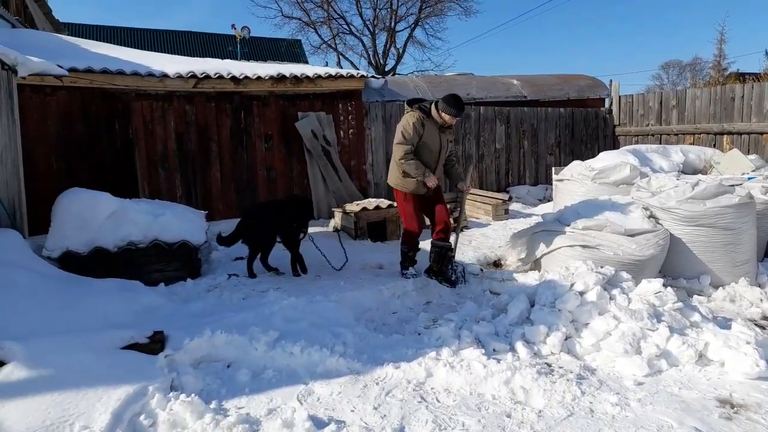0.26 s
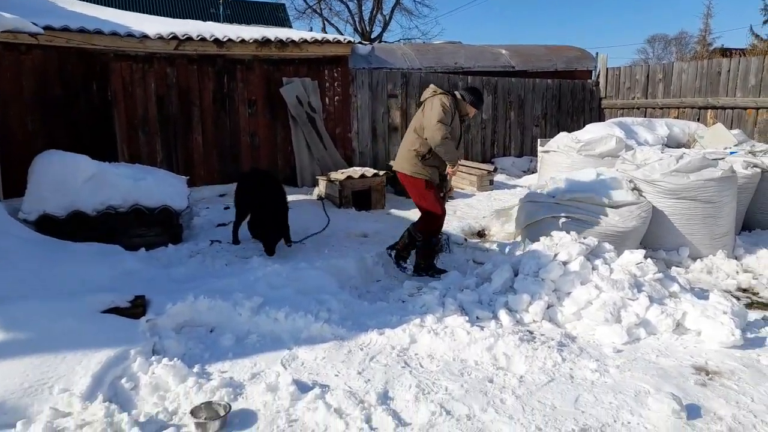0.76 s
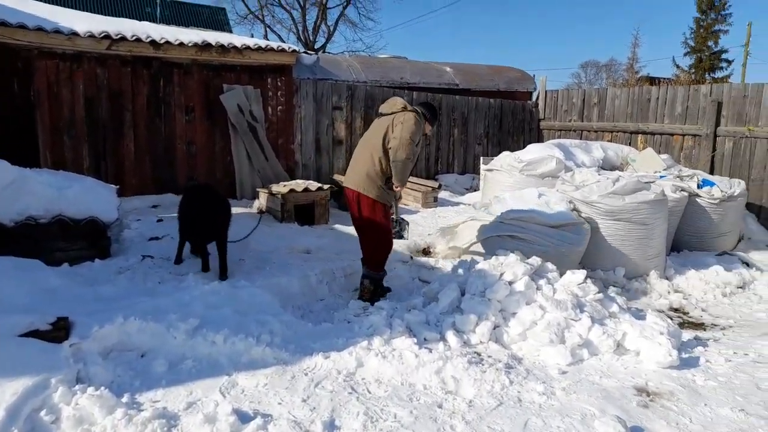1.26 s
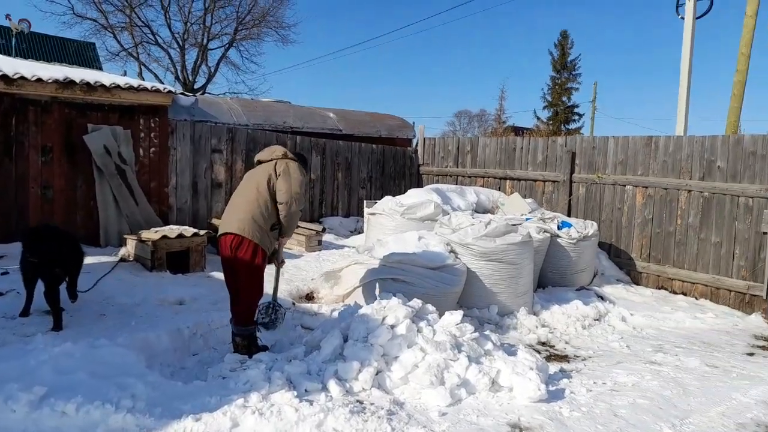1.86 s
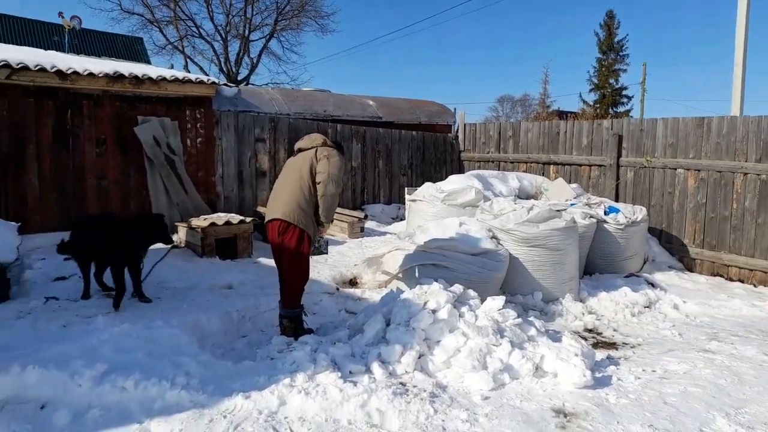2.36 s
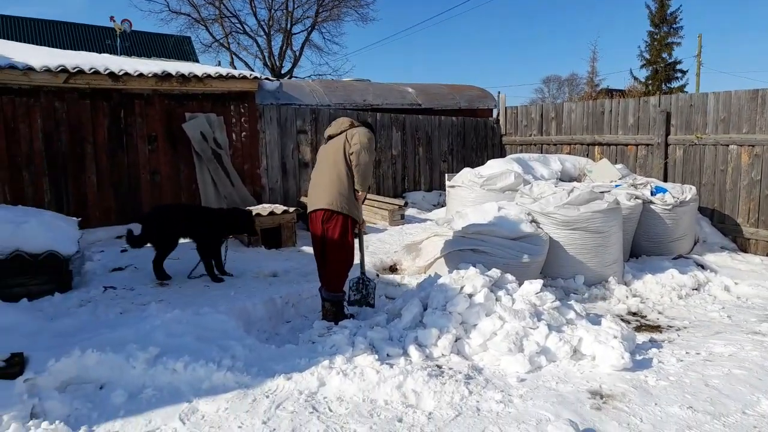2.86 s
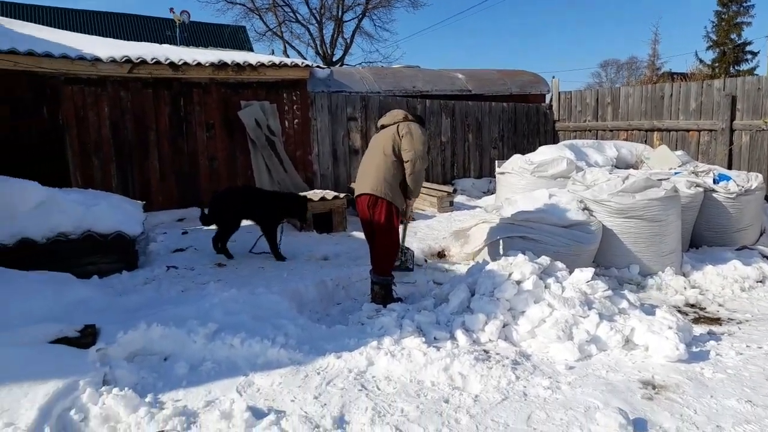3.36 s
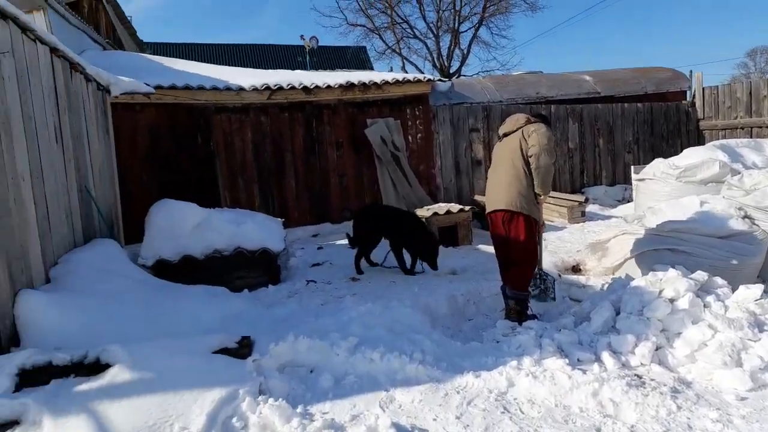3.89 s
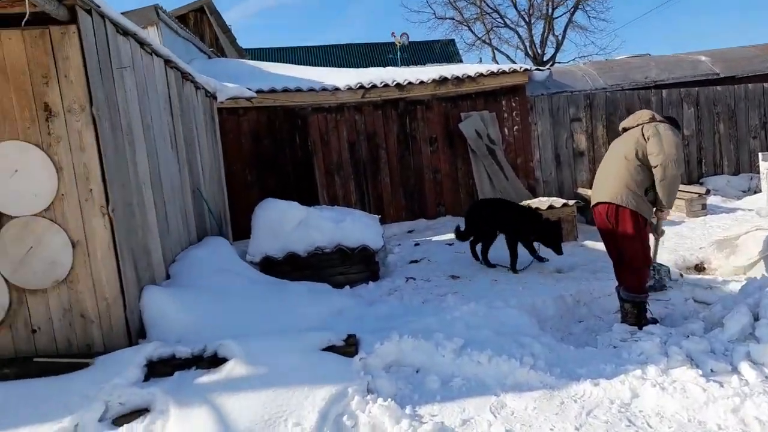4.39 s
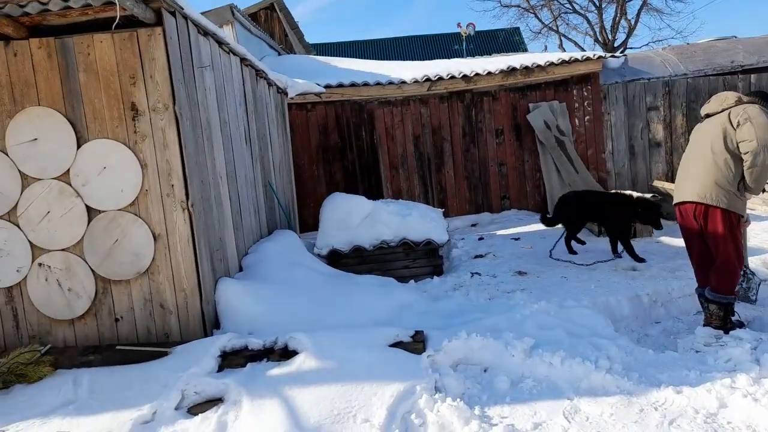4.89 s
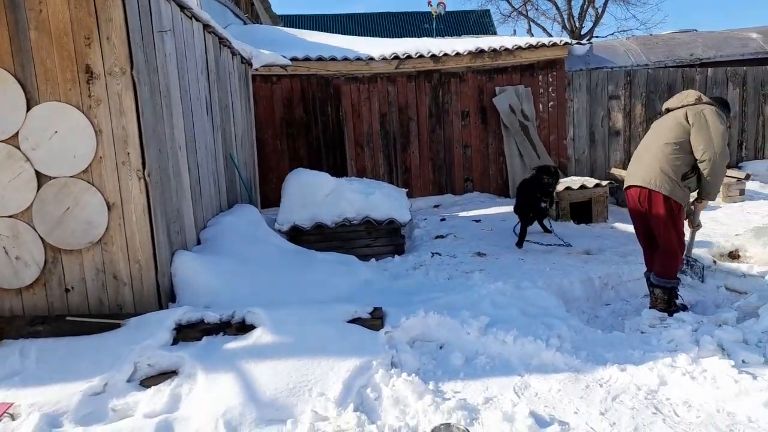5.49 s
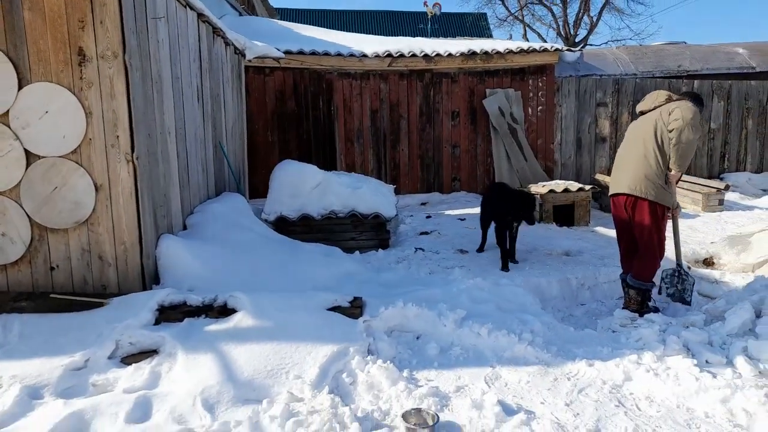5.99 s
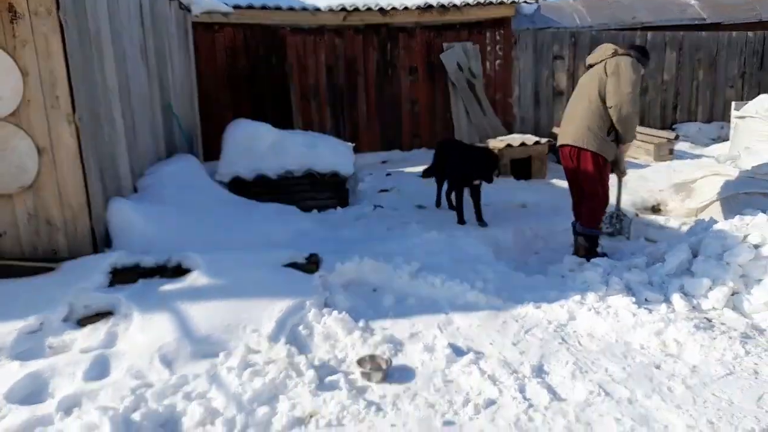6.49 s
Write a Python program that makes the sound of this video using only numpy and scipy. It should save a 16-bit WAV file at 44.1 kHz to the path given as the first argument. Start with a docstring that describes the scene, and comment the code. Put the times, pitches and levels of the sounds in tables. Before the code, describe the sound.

Low, fluttering gusts hit an unprotected microphone while someone in rustling winter clothing shovels crusty snow. After a quiet start come sharp, dry chops with a brief low thud, crackling crystals, a short scrape and loose crumbs falling. Bright high chain links jingle lightly between the strokes, and small metal clinks occur twice. Open yard, very little echo, shovel at a moderate distance.

```python
"""A shovel chops and scrapes packed snow in a fenced yard.
Crystals crack under the blade as random clicks, and its resonances colour them; loose snow patters down.
A chain jingles and metal clinks twice, both as fading sines. Clothing and boots rustle as shaped noise.
Gusts buffet the microphone as lumpy low noise; a changing lag between the ears moves the shovel."""
import sys
import numpy as np
from scipy import signal
from scipy.fft import rfft, irfft, next_fast_len
from scipy.io import wavfile
from scipy.ndimage import uniform_filter1d

SR = 44100
rng = np.random.default_rng(int(sys.argv[2]) if len(sys.argv) > 2 else 0)


def inscribe(sig):
    """Save sig as 16-bit PCM at rate SR to the path in sys.argv[1].

    A 1-D sig is mono; a 2-D sig holds one channel per row.
    Samples are clipped to [-1, 1] before scaling.
    """
    pcm = np.round(np.clip(np.atleast_2d(sig).T, -1, 1) * 32767)
    wavfile.write(sys.argv[1], SR, pcm.astype(np.int16))


N = 297410  # length of the scene in samples


def from_db(db):
    """Turns decibels into a gain."""
    return 10 ** (np.asarray(db) / 20)


def rms_one(x):
    """Scales a sound to unit power."""
    return x / np.sqrt(np.mean(x ** 2) + 1e-20)


def in_time(rows):
    """Draws straight lines between the rows and reads each column at every sample."""
    seconds, *columns = np.transpose(rows)
    return [np.interp(np.arange(N) / SR, seconds, column) for column in columns]


def drift(rate_hz):
    """Random wandering that is slower than about rate_hz; rms 1."""
    size = next_fast_len(N, real=True)
    hz = np.arange(size // 2 + 1) * SR / size
    slowed = rfft(rng.standard_normal(size)) / (1 + (hz / rate_hz) ** 4)
    return rms_one(irfft(slowed, size)[:N])


def noise(spectrum, alike):
    """Stereo noise of a given colour; alike is the share of power common to both channels; rms 1."""
    table_hz, table_db = np.transpose(spectrum)
    size = next_fast_len(N, real=True)
    hz = np.arange(size // 2 + 1) * SR / size
    gain = from_db(np.interp(np.log(hz + 1e-9), np.log(table_hz), table_db, left=-np.inf))
    alike = np.clip(alike, 0, 1)
    shared = np.sqrt(alike) * rng.standard_normal(size)
    white = shared + np.sqrt(1 - alike) * rng.standard_normal((2, size))
    return rms_one(irfft(rfft(white) * gain, size)[:, :N])


def band(x, low_hz, high_hz, order=2):
    """Keeps only the pitches between two limits."""
    edges = [low_hz, min(high_hz, .47 * SR)]
    return signal.sosfilt(signal.butter(order, edges, "band", fs=SR, output="sos"), x + 1e-18)


def narrow(hz, width_hz):
    """A band of stereo hiss around one pitch; rms 1."""
    return rms_one(band(rng.standard_normal((2, N)), hz - width_hz / 2, hz + width_hz / 2))


def register(x, low_hz, high_hz):
    """One band of the crackle; white input keeps its power."""
    return band(x, low_hz, high_hz, order=3) * np.sqrt(SR / 2 / (high_hz - low_hz))


def ring(clicks, hz, t60):
    """Each unit click starts a sine of height 1 that falls by 60 dB in t60 seconds."""
    keep = from_db(-60 / (t60 * SR))  # what is left after one sample
    w = 2 * np.pi * hz / SR
    return signal.lfilter([0, np.sin(w)], [1, -2 * keep * np.cos(w), keep * keep], clicks + 1e-18)


def envelope(start, length, attack, release):
    """Exponential swell up to the start, hold at 1, exponential decay; all in seconds."""
    t = np.arange(N) / SR
    before = np.maximum(start - t, 0) / attack
    after = np.maximum(t - start - length, 0) / release
    return np.exp(-np.minimum(before + after, 30))


def evened(x, window_s):
    """Holds the level of a noise steady over a short, rounded window."""
    size = int(window_s * SR)
    power = uniform_filter1d(uniform_filter1d(np.mean(x ** 2, axis=0), size), size // 2)
    return x / np.sqrt(power + 1e-6)


def crumbs(per_s, cycles, low_hz=1400, high_hz=8500, count=20):
    """Lumps of crust snap off at random, each with a short ring at one of several pitches; rms 1."""
    sizes = from_db(4.0 * np.minimum(rng.exponential(1, N), 3))
    snaps = sizes * rng.choice([-1, 1], N) * (rng.random(N) < per_s / SR)
    dealt = rng.integers(0, count, N)  # which pitch each lump gets
    total = np.zeros((2, N))
    for k, hz in enumerate(np.geomspace(low_hz, high_hz, count)):
        ringing = ring(snaps * (dealt == k), hz, cycles / hz)
        total += ringing * np.sqrt(hz) * rng.uniform(0.28, 1, (2, 1))
    return rms_one(total)


# Steady breeze on the microphone. Each row: time in seconds, strength in dB.
BREEZE = [(0, -38.5), (.3, -33.5), (.6, -42.5), (.95, -35), (1.22, -57), (1.5, -49.5), (1.7, -42),
          (2.05, -26), (2.3, -42), (2.49, -29), (2.58, -49), (2.8, -58), (3.4, -73), (3.88, -40.5),
          (4.12, -55), (4.85, -30.5), (5.35, -39.5), (5.72, -27.5), (6.27, -73), (6.72, -45)]
# Gusts on top of it. Each row: peak time in seconds, strength in dB,
# time to rise or sink by a factor e in seconds.
GUSTS = [(0.215, -22, 0.026), (0.432, -29.5, 0.039), (0.757, -27.5, 0.047), (1.624, -34, 0.014),
         (2.195, -23, 0.024), (1.98, -32, 0.0097), (3.129, -38.5, 0.026), (4.804, -22, 0.023),
         (5.174, -25.5, 0.038), (5.497, -21, 0.011), (5.98, -30.5, 0.14), (6.541, -34, 0.096)]
# Sudden puffs of wind. Each row: peak time in seconds, level in dB, half length in seconds.
PUFFS = [(0.142, -25, 0.0071), (0.196, -16, 0.016), (.25, -10, 0.013), (0.757, -32, 0.033),
         (1.972, -28, 0.0062), (2.058, -24, 0.0017), (2.178, -39, 0.006), (4.846, -29, 0.0022),
         (4.949, -35.5, 0.0074), (5.185, -45, 0.016), (5.747, -33.5, 0.062)]
# Colours of the low rumble, the flutter and the puffs. Each row: pitch in Hz, relative level in dB per Hz.
RUMBLE_COLOUR = [(15, -32), (30, -15), (50, 2.5), (110, 5), (160, 4), (230, -4.5), (400, -51)]
FLUTTER_COLOUR = [(90, 3), (150, 0.5), (290, 1.5), (480, -6), (680, -20), (950, -31.5), (1500, -36.5),
                  (4000, -101)]
PUFF_COLOUR = [(30, -59), (110, -5), (280, 7.5), (500, 1.5), (720, -7), (1000, -22.5), (1600, -38.5),
               (5000, -53)]
WIND_TOP_HZ = 3000  # the wind holds no treble above this pitch


def wind():
    """Eddies hit the microphone in lumps; the stronger the gust, the higher in pitch it reaches."""
    t = np.arange(N) / SR
    breeze_db = -40  # strength at which the three layers have their base levels
    power = from_db(in_time(BREEZE)[0]) ** 2
    for s, db, length in GUSTS:
        power = power + (from_db(db) * envelope(s, 0, length, length)) ** 2
    gust_db = 10 * np.log10(power) - breeze_db
    lumps = rms_one(from_db(5.57 * np.array([drift(45.0), drift(64)])))  # one row per channel
    rumble = from_db(breeze_db - 1.0 + 0.77 * gust_db) * evened(noise(RUMBLE_COLOUR, alike=0.078), 0.078)
    flutter = from_db(breeze_db - 3.5 + 1.0 * gust_db) * evened(noise(FLUTTER_COLOUR, alike=0.04), 0.05)
    buffet = from_db(breeze_db - 21.5 + 1.59 * gust_db)
    puffs = sum(from_db(db) * np.exp(-.5 * ((t - s) / length) ** 2) for s, db, length in PUFFS)
    gusty = np.hypot(buffet, puffs) * evened(noise(PUFF_COLOUR, alike=0.32), 0.0094)
    eddies = lumps * (rumble + flutter) + gusty
    return signal.sosfilt(signal.butter(2, WIND_TOP_HZ, fs=SR, output="sos"), eddies)


# Colour of the still air. Each row: pitch in Hz, relative level in dB per Hz.
AIR_COLOUR = [(250, 13.5), (550, 12), (1200, -3.5), (2500, -4), (4300, -15.5), (6700, -4.5), (9000, -8.5),
              (15500, -10)]


def still_air():
    """A faint, steady, coloured hiss."""
    return from_db(-57.5) * noise(AIR_COLOUR, alike=0.058)


# Movements that stir clothing and loose snow. Each row: start in seconds, length in seconds, level in dB.
MOVES = [(0.07, 0.19, -59.5), (0.368, 0.48, -56), (0.967, 0.13, -54.5), (1.475, 0.21, -51.5),
         (1.845, .19, -48), (2.482, 0.37, -53.5), (3.437, 0.62, -53.5), (4.322, 0.6, -52.5),
         (5.064, 0.062, -53), (5.545, 0.39, -50), (6.335, 0.44, -56.5)]
# Boots scuffing the snow. Each row: time in seconds, level in dB.
STEPS = [(.578, -51), (.663, -49.5), (.96, -49), (1.125, -52), (5.388, -51.5), (6.095, -62.5)]
# Colour of rustling cloth. Each row: pitch in Hz, relative level in dB per Hz.
CLOTH_COLOUR = [(500, 14.5), (1200, 0.5), (2500, 0.5), (4200, -2.5), (6500, -2), (9500, -4), (14000, -2.5),
                (17000, -20)]
MOVE_ATTACK_S, MOVE_RELEASE_S = 0.085, 0.1
STEP_ATTACK_S, STEP_RELEASE_S = 0.014, 0.012


def rustle():
    """Every movement and step stirs cloth and loose snow, with fine crumbs trickling through it."""
    power = np.zeros(N)
    for s, length, db in MOVES:
        power += (from_db(db) * envelope(s, length, MOVE_ATTACK_S, MOVE_RELEASE_S)) ** 2
    for s, db in STEPS:
        power += (from_db(db) * envelope(s, 0, STEP_ATTACK_S, STEP_RELEASE_S)) ** 2
    cloth = noise(CLOTH_COLOUR, alike=0.018) + from_db(-15.0) * crumbs(per_s=200, cycles=12)
    return np.sqrt(power) * from_db(1.0 * drift(110)) * cloth


# Sharp metal clinks. Each row: time in seconds, relative level in dB.
CLINKS = [(0.3208, -18), (3.994, -18)]
# Ringing tones of the metal. Each row: pitch in Hz, relative level in dB, time to fall by 60 dB in seconds.
METAL = [(2850, -2, 0.017), (3080, 12, 0.019), (4800, 3.5, 0.012), (5580, -4, 0.047), (6340, -8, 0.21),
         (10960, 1.5, 0.015)]


def clinks():
    """A hard contact: a brief crack of noise and a thin ring."""
    t = np.arange(N) / SR
    clicks, crack = np.zeros((2, N)), np.zeros(N)
    for s, db in CLINKS:
        clicks[:, int(s * SR)] = from_db(db)
        crack += from_db(db) * (t >= s) * np.exp(-np.abs(t - s) / 0.0037)
    rings = sum(from_db(db - 18.0) * ring(clicks, hz, t60) for hz, db, t60 in METAL)
    hiss = rms_one(band(rng.standard_normal((2, N)), 1100, 5400, order=1))
    return rings + from_db(-10.0) * hiss * crack


# A sleeve zips thinly over the jacket as the shovel is lifted.
# Each row: start in seconds, length in seconds, relative level in dB, pitch in Hz.
ZIPS = [(1.476, 0.021, -45.5, 8500), (1.513, 0.014, -51, 8900), (1.542, 0.019, -47.5, 8930),
        (1.572, 0.011, -51.5, 9500), (1.599, 0.013, -49.5, 9150), (1.615, 0.0049, -46, 10100)]
ZIP_UPPER_RATIO, ZIP_WIDTH_HZ, ZIP_ROUGH_DB = 1.18, 500, 3  # second band's pitch ratio, width, roughness


def sleeve():
    """Ribbed fabric catches on itself: each stroke is a rough scratch with two hoarse bands."""
    scratch = from_db(-5.0) * narrow(10800, 7000)
    strokes = np.zeros((2, N))
    for s, length, db, hz in ZIPS:
        lower = narrow(hz, ZIP_WIDTH_HZ)
        upper = narrow(hz * ZIP_UPPER_RATIO, 2 * ZIP_WIDTH_HZ)
        strokes += from_db(db) * envelope(s, length, 0.01, 0.0084) * rms_one(lower + upper + scratch)
    return strokes * rms_one(from_db(ZIP_ROUGH_DB * drift(200)))


RASP_START_S, RASP_LENGTH_S, RASP_DB = 1.56, 0.41, -56  # around the first stroke


def rasp():
    """A dry, faint, narrow rubbing sound, perhaps the handle sliding through a glove."""
    hiss = rms_one(band(rng.standard_normal((2, N)), 2120, 2700))
    return from_db(RASP_DB + 2.0 * drift(25)) * envelope(RASP_START_S, RASP_LENGTH_S, 0.04, .04) * hiss


# Soft low thumps on the microphone. Each row: peak time in seconds, level in dB, pitch in Hz.
THUMPS = [(1.622, -24.5, 144.5), (3.105, -49, 120), (4.793, -24, 102.5)]


def thumps():
    """Low bumps of a few cycles each, swelling and fading around their peak."""
    t = np.arange(N) / SR
    total = np.zeros((2, N))
    for s, db, hz in THUMPS:
        wave = np.sin(2 * np.pi * hz * t + rng.standard_normal((2, 1)))  # random phase per channel
        total += from_db(db) * envelope(s, 0, 1 / hz, 1 / hz) * wave
    return total


# Direction of the shovel. Each row: time in seconds, lag of the left channel in ms.
BEARING = [(1.8, -0.057), (2.53, -0.038), (3.44, 0.005), (3.76, 0.086), (4.46, 0.24), (5.9, 0.25),
           (6.5, 0.14), (6.7, 0.12)]


def fractures(per_s, spread_db, direct):
    """Crystals crack at random; a direct share arrives with the shovel's lag, the rest is scattered."""
    sizes = from_db(spread_db * np.minimum(rng.exponential(1, (3, N)), 5))
    cracks = sizes * rng.choice([-1, 1], (3, N)) * (rng.random((3, N)) < per_s / SR)
    lag_ms, = in_time(BEARING)
    late = np.clip(np.arange(N) - np.round(lag_ms * SR / 1000).astype(int), 0, N - 1)
    direct = np.clip(direct, 0, 1)
    from_shovel = np.array([cracks[0, late], cracks[0]])
    return rms_one(np.sqrt(direct) * from_shovel + np.sqrt(1 - direct) * cracks[1:])


# The blade biting the crust. Each row: peak time in seconds, crunch in dB, thud relative to the crunch
# in dB, grind relative to the crunch in dB, time to fall by a factor e in seconds.
BITES = [(1.787, -13.5, -9, 2.5, 0.0038), (1.802, -32.5, 0.5, 9, 0.0034), (1.811, -29, -1, 10.5, 0.0016),
         (2.527, -12.5, -5.5, 0.5, 0.0028), (2.654, -34.5, -7, 6.5, 0.012), (2.706, -36.5, -29, 5.5, 0.006),
         (3.439, -24, -11, -0.5, 0.02), (3.639, -35.5, -14, 3, 0.0035), (3.747, -23.5, -33, -5.5, 0.033),
         (3.766, -23, -21, -7, 0.0079), (4.426, -35, -12, -9, 0.016), (4.465, -14, -12, -7, 0.006),
         (4.787, -30.5, -22, 9, 0.0046), (5.456, -25, -21, -0.5, 0.0015),
         (5.492, -15.5, -19.5, -7.5, 0.007), (5.702, -26.5, -4, -2, 0.0015),
         (5.711, -33.5, -17, -11, 0.0037), (5.778, -32.5, -24, -4, 0.0037), (6.506, -32.5, -37, -6, 0.02),
         (6.577, -27, -10.5, -2.5, 0.0057), (6.659, -26.5, -38, -1.5, 0.0029),
         (6.688, -30, -38, -32.5, 0.022)]
BITE_RISE_S, RISE_PER_FALL = 0.0026, 0.077  # a bite that lasts longer also builds more slowly
FIZZ_DB, FIZZ_FOLLOWS = -22.5, 0.68  # the finest crackle grows more slowly than the force


def chops():
    """Each bite is a quick swell of fractures; the low thud follows a moment later."""
    t, power = np.arange(N) / SR, np.zeros((4, N))
    for s, db, thud_db, grind_db, fall in BITES:
        near = slice(int((s - .05) * SR), int((s + .15) * SR))
        since = t[near] - s
        rise = BITE_RISE_S + RISE_PER_FALL * fall
        swell = np.exp(-np.abs(since) / np.where(since < 0, rise, fall))
        late_swell = np.exp(-np.abs(since - .003) / np.where(since < .003, rise, 1.24 * fall))
        gains = from_db([[db + thud_db], [db + grind_db], [db], [FIZZ_DB + FIZZ_FOLLOWS * db]])
        power[:, near] += (gains * [late_swell, swell, swell, swell]) ** 2
    thud, grind, crunch, fizz = np.sqrt(power)
    cracks = fractures(per_s=9000, spread_db=3.5, direct=0.67)
    return (from_db(0.5) * register(thud * cracks, 182, 793)
            + from_db(-7.0) * register(grind * cracks, 1135, 2740)
            + from_db(-6.5) * register(crunch * cracks, 3760, 7430)
            + from_db(5.0) * register(fizz * cracks, 8800, 15000))


# Colour of falling snow. Each row: pitch in Hz, relative level in dB per Hz.
SPILL_COLOUR = [(300, 7.5), (1000, -4.5), (2300, -4.5), (4000, -14.5), (8000, -16), (15000, -15.5)]
SPILL_DB, SPILL_FALL_S = -5, 0.023  # level relative to the bite's finest crackle


def spill():
    """Loose snow patters down after every bite, more of it after a hard one."""
    power = np.zeros(N)
    for s, db, *_ in BITES:
        level = from_db(SPILL_DB + FIZZ_DB + FIZZ_FOLLOWS * db)
        power += (level * envelope(s, 0.02, 0.0038, SPILL_FALL_S)) ** 2
    return np.sqrt(power) * from_db(2.0 * drift(150)) * noise(SPILL_COLOUR, alike=0.22)


# Low ring of the shaft. Each row: pitch in Hz, level relative to the thud in dB,
# time to fall by 60 dB in seconds.
SHAFT = [(259.6, -9, 0.16), (331, -2, 0.053), (390, -10, 0.058)]


def shaft():
    """Every bite knocks the shaft, which hums briefly."""
    knocks = np.zeros(N)
    for s, db, thud_db, *_ in BITES:
        knocks[int(s * SR)] = from_db(db + thud_db)
    # neighbouring tones start in opposite directions
    return sum((-1) ** k * from_db(db) * ring(knocks, hz, t60) for k, (hz, db, t60) in enumerate(SHAFT))


# The blade pushed through the snow. Each row: start in seconds, length in seconds, crunch in dB, fade over
# the push in dB (negative grows), grind relative to the crunch in dB, fizz relative to the crunch in dB.
PUSHES = [(1.83, 0.16, -75, 9, 12.5, -16), (2.531, 0.058, -40, 1.5, 11.5, -11),
          (2.58, 0.061, -37, -6, 0, -14), (2.702, 0.022, -37, 2.5, -5, -23),
          (2.736, 0.076, -43.5, 2.5, 2, -11), (3.6, 0.07, -41, -4.5, -0.5, -8.5),
          (3.792, 0.079, -38.5, 11.5, -1, -7), (4.65, 0.05, -40.5, 7.5, 3.5, -10.5),
          (4.779, 0.098, -38.5, 22.5, 8.5, -10), (5.642, 0.023, -44.5, -6, -1, -11),
          (5.748, 0.099, -36.5, 6, -2.5, -12), (5.915, 0.024, -41, -5, 1.5, -11),
          (6.517, 0.034, -38.5, 4, 6, -9), (6.602, 0.027, -45.5, -0.5, 7, -5),
          (6.626, 0.019, -39, 0, -1.5, 0), (6.707, 0.036, -34, 6.5, 0.5, -5)]
PUSH_ATTACK_S, PUSH_RELEASE_S = 0.0089, 0.024


def sliding():
    """Strength of crunch, grind and fizz: each push swells, fades or grows, and stops."""
    t, power = np.arange(N) / SR, np.zeros((3, N))
    for s, length, db, fade_db, grind_db, fizz_db in PUSHES:
        level = from_db(db - fade_db * np.clip((t - s) / length, 0, 1))
        push = envelope(s, length, PUSH_ATTACK_S, PUSH_RELEASE_S) * level
        power += from_db([[0], [grind_db], [fizz_db]]) ** 2 * push ** 2
    return np.sqrt(power)


SLIP_DB, SLIPS_HZ, GRIT_DB = 1.5, 46.2, 2.06  # unevenness: shared, its rate, and within each register


def scrapes():
    """The sliding blade sticks and slips, so the crackle comes in clumps."""
    shared_db = SLIP_DB * drift(SLIPS_HZ)
    own_db = GRIT_DB * np.array([drift(SLIPS_HZ) for _ in range(3)])
    crunch, grind, fizz = sliding() * from_db(shared_db + own_db)
    cracks = fractures(per_s=1800, spread_db=3.6, direct=0.66)
    return (from_db(-13.5) * register(cracks * grind, 172, 1160)
            + from_db(-8.5) * register(cracks * grind, 880, 3850)
            + from_db(-7.0) * register(cracks * crunch, 4570, 7400)
            + from_db(0.5) * register(cracks * fizz, 9400, 14600)
            + from_db(-12.0) * crunch * crumbs(per_s=600, cycles=41, low_hz=2860)
            + from_db(-13.5) * grind * crumbs(per_s=400, cycles=15, low_hz=594, high_hz=3260, count=16))


# How the blade meets the snow. Each row: time in seconds, contact (0 corner, 1 whole edge, 2 flat).
CONTACT = [(2.54, 0), (2.59, .5), (3.4, 1), (3.9, 1), (4.4, 2), (5.55, 2), (5.7, 1.2)]
# Resonances and hollows of the blade. Each row: pitch in Hz, width in Hz, then the average boost in dB
# when its corner digs, when its whole edge digs and when it lands flat.
BLADE = [(215, 126, 7, 2.5, 5.5), (491, 52, 11, 5.5, 9), (721, 130, -10, 3.5, 9), (865, 59, 5.5, 10.5, 8),
         (1363, 61, 7, 3, 2.5), (1600, 84, 6.5, 0.5, -18), (2530, 68, 3, 7.5, 0), (3310, 67, 9.5, 6, 8.5),
         (3800, 220, 4.5, 2, 4), (4220, 1300, -28, 0.5, 0), (5960, 670, 12, -1.5, -1.5),
         (6600, 190, -4, 1.5, 5.5), (7700, 380, 8, 2.5, 3)]
WANDER_DB, WANDER_HZ = 2.4, 9  # size and rate of the random wandering of each boost


def blade(x):
    """The blade rings at its resonances; each is driven more or less as the contact point wanders."""
    out, (contact,) = x, in_time(CONTACT)
    for hz, width, *contact_db in BLADE:
        ringing = signal.lfilter(*signal.iirpeak(hz, hz / width, fs=SR), x)
        db = np.interp(contact, [0, 1, 2], contact_db) + WANDER_DB * drift(WANDER_HZ)
        out = out + ringing * (from_db(db) - 1)  # the plain sound already holds a gain of 1
    return out


# Close echo off the hard snow. Each row: time in seconds, delay in ms.
GROUND = [(2.7, 1.1), (3.6, 1.2), (4.5, 1.18), (6.6, 0.98)]
GROUND_DB, GROUND_LOW_HZ = -22, 590


def ground(x):
    """A close echo off the packed snow hollows the crackle like a comb."""
    n, (delay_ms,) = np.arange(N), in_time(GROUND)
    echo = signal.sosfilt(signal.butter(1, GROUND_LOW_HZ, "high", fs=SR, output="sos"), x)
    delayed = np.array([np.interp(n - delay_ms * SR / 1000, n, side) for side in echo])
    return x + from_db(GROUND_DB) * delayed


# Packed snow squeaking. Each row: start in seconds, length in seconds, relative level in dB, pitch in Hz.
SQUEAKS = [(2.654, 0.021, -35.5, 6700), (2.694, 0.012, -39, 7340)]


def squeaks():
    """Snow packed tight under the blade gives short, hoarse squeaks."""
    return sum(from_db(db) * envelope(s, length, .004, 0.0035) * narrow(hz, 700)
               for s, length, db, hz in SQUEAKS)


# Chain links touching. Each row: time in seconds, relative level in dB,
# upper rings relative to the main ring in dB.
CHAIN = [(2.675, -43, -10), (2.858, -35.5, -16), (2.917, -46, -12), (2.935, -41, -15), (3.029, -49.5, 2),
         (3.1697, -52, -2), (3.377, -36.5, -16), (3.495, -42.5, -1), (3.524, -35, -5), (3.7355, -31, -15),
         (3.7494, -34, -12), (4.317, -41, -5), (4.339, -29, -6), (4.352, -29, -1), (4.372, -38, 1),
         (4.516, -33, -14), (4.711, -40.5, -5), (5.5616, -48, -10), (5.66, -40, -8), (5.726, -26.5, -19),
         (5.784, -38, -12), (5.8282, -28, -23)]
# Ringing tones of a link, the main ring (a close pair) first.
# Each row: average pitch in Hz, relative level in dB, time to fall by 60 dB in seconds.
LINK = [(10340, 1, 0.18), (10460, 1.5, 0.13), (11400, 1, 0.13), (11500, -3, 0.099), (12700, -4, 0.1)]
# the chain trails between its louder touches
TRAIL_START_S, TRAIL_END_S, TRAIL_PER_S = 2.87, 3.56, 24
TRAIL_DB, TRAIL_UPPER_DB = -53.5, -3
REBOUNDS_DB, REBOUND_WAIT_S = -13, 0.0062  # each further link is weaker; longest wait before it
LINK_DB, LINK_SPREAD_DB, LINK_PITCH_SPREAD, TICK_DB = -9, 6, 0.00692, 4  # pitch spread is a fraction


def chain():
    """Links of a dog's chain touch one after another, each ringing at a pitch of its own."""
    out, ticks = np.zeros((2, N)), np.zeros(N)
    t = np.arange(SR // 6) / SR
    hz, mode_db, t60 = np.transpose(LINK)[:, :, None]
    decay = from_db(mode_db - 60 * t / t60) * (1 - np.exp(-t / 0.0017))
    trailing = [(s + rng.uniform(-0.022, 0.027), TRAIL_DB + 4 * rng.standard_normal(), TRAIL_UPPER_DB)
                for s in np.arange(TRAIL_START_S, TRAIL_END_S, 1 / TRAIL_PER_S)]
    upper = np.arange(len(LINK)) >= 2
    for s, db, upper_db in CHAIN + trailing:
        waits = np.cumsum([0, *REBOUND_WAIT_S * rng.uniform(0.68, 1, size=3)])
        for bounce, wait in enumerate(waits):
            start = int((s + wait) * SR)
            link_db = db + REBOUNDS_DB * bounce
            pitch = hz * (1 + LINK_PITCH_SPREAD * rng.standard_normal(hz.shape))
            chance_db = LINK_SPREAD_DB * rng.standard_normal((2, len(LINK)))
            strength = from_db(link_db + LINK_DB + upper_db * upper + chance_db)
            out[:, start:start + len(t)] += strength @ (decay * np.sin(2 * np.pi * pitch * t))
            ticks[start:start + len(t)] += from_db(link_db + TICK_DB) * np.exp(-t / 0.0048)
    return out + ticks * band(rng.standard_normal((2, N)), 10100, 13200)


def yard(x):
    """Scattered echoes from sheds and fence, soon swallowed by the snow."""
    t = np.arange(SR // 2) / SR
    hits = rng.random((2, len(t))) < .05
    fading = (t > .012) * from_db(-60 * t / 0.19)
    echoes = band(rng.standard_normal((2, len(t))) * hits * fading, 230, 8050, order=1)
    echoes = echoes / np.linalg.norm(echoes, axis=1, keepdims=True)
    return signal.oaconvolve(x, echoes, axes=1)[:, :N]


def scene():
    """The shovel is a little louder on the right; the yard echoes it faintly, under wind and still air."""
    background = wind() + still_air() + rustle() + thumps()
    snow = blade(chops() + scrapes()) + spill() + squeaks()
    shovel = ground(snow) * from_db(np.array([[-1.4], [0.8]]))  # left, right
    sources = shovel + shaft() + clinks() + sleeve() + rasp() + chain()
    return sources + from_db(-18.5) * yard(sources) + background


CUTOFF_HZ = 16000


def record(dry):
    """Peaks are rounded and the top is cut steeply."""
    rounded = .7 * np.tanh(dry / .7)
    return signal.sosfilt(signal.ellip(12, .1, 90, CUTOFF_HZ, fs=SR, output="sos"), rounded)


dry = scene()
out = record(dry)
inscribe(out)
```